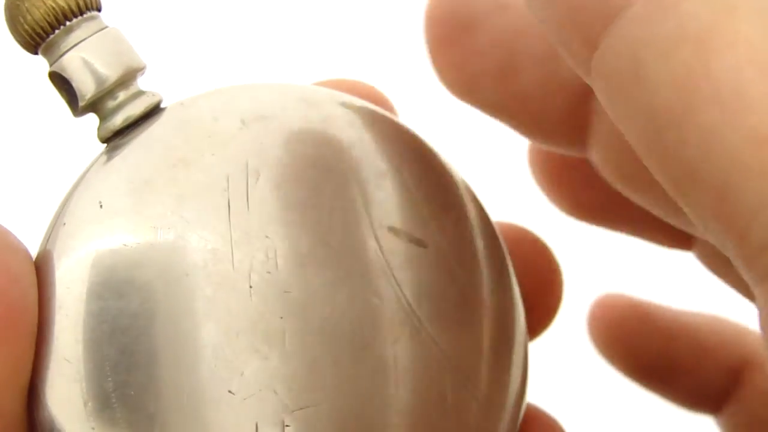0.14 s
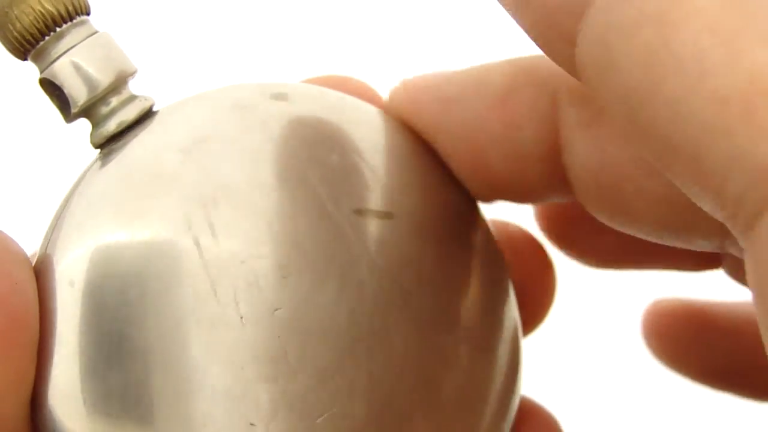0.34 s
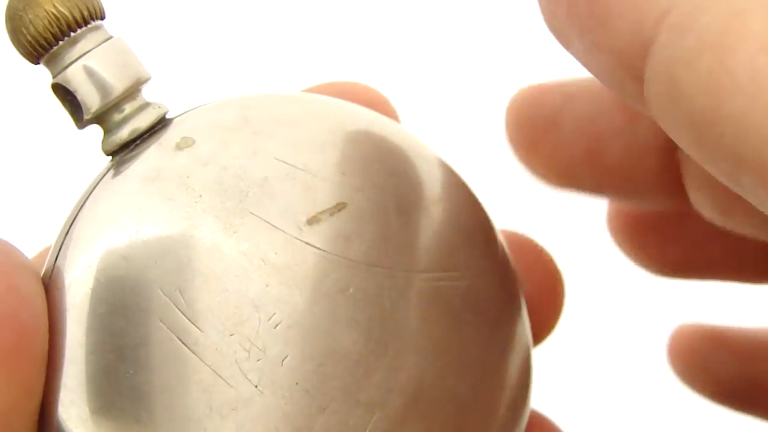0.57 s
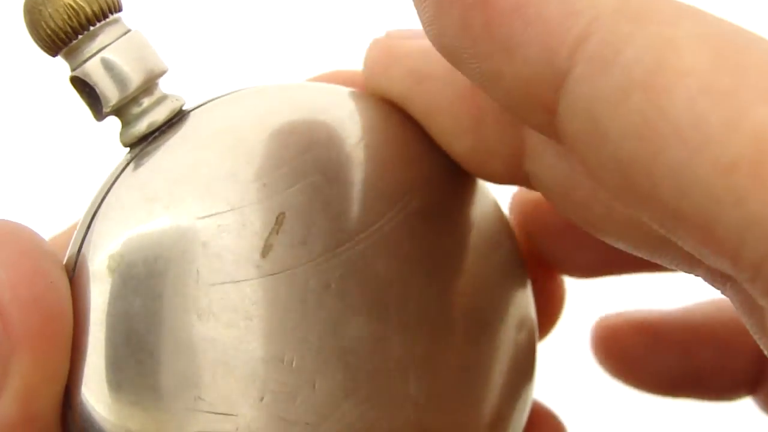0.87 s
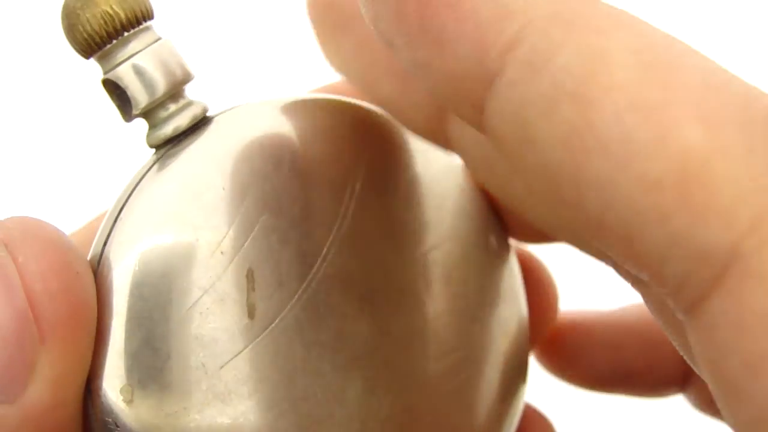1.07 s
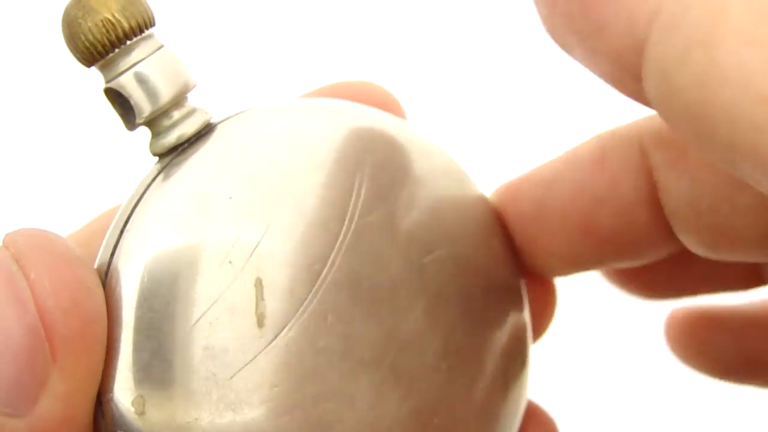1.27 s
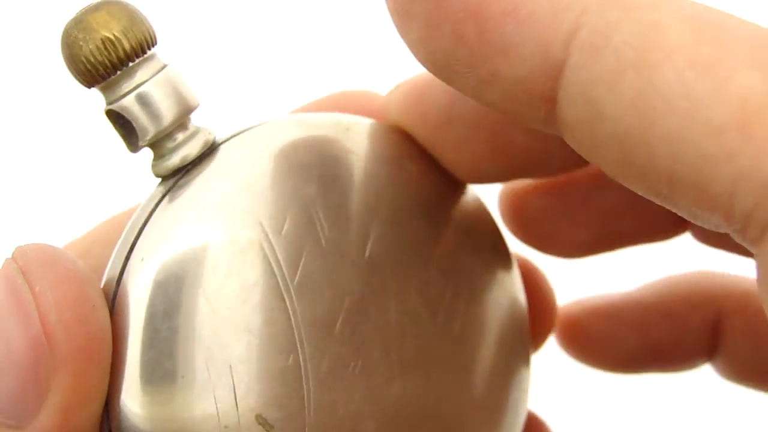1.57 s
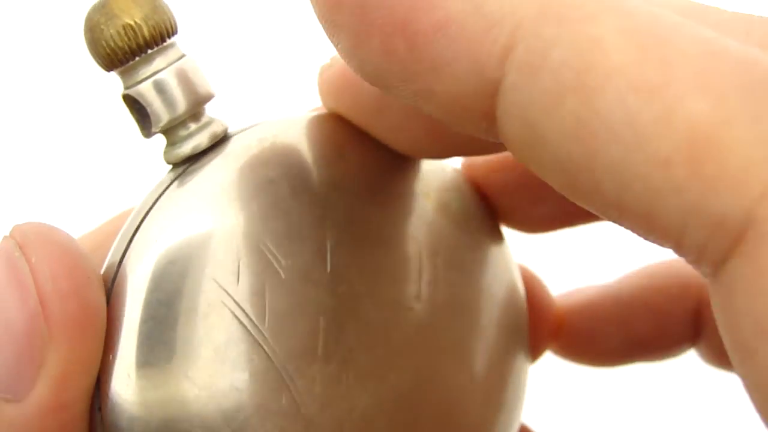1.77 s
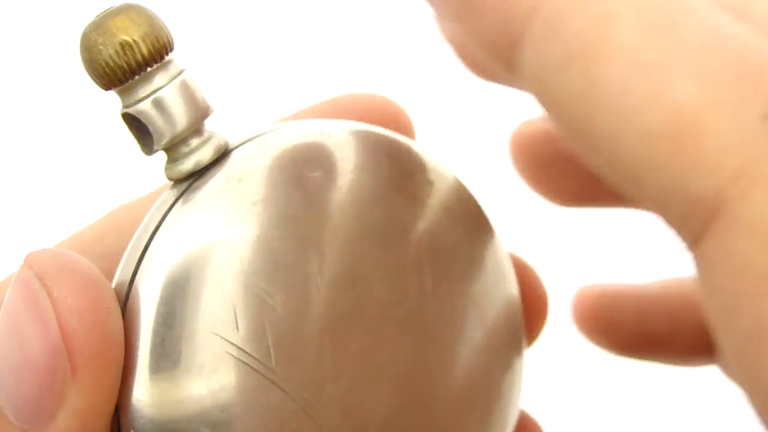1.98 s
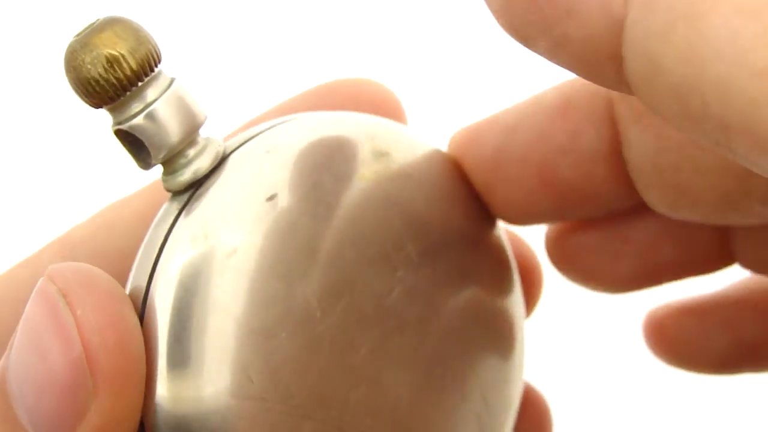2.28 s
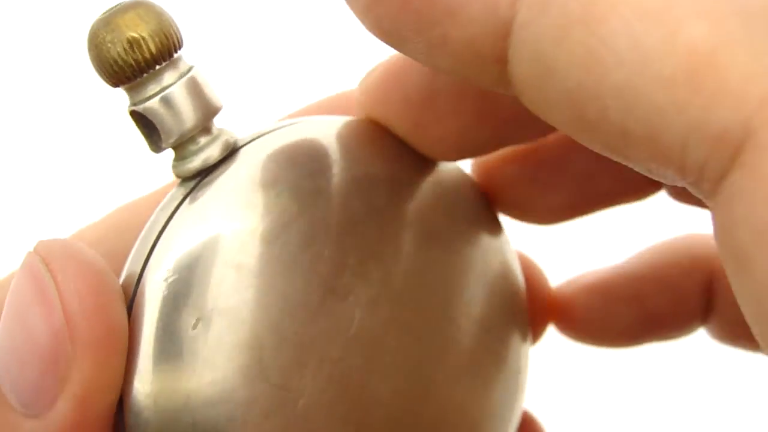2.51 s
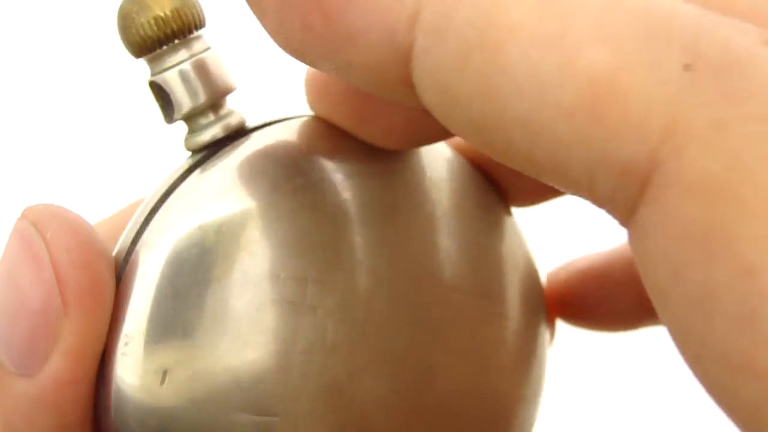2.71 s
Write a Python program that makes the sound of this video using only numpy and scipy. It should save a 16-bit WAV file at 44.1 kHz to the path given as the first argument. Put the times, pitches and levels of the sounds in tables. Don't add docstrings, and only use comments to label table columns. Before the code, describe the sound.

Close up in a quiet room, nails rub and slip around a thin metal watch case, gritty at first, then softer and sparser, before a much louder cluster of metallic clicks with a brief ring.

```python
import sys
import numpy as np
from scipy import signal
from scipy.fft import rfft, irfft
from scipy.io import wavfile

SR = 44100
rng = np.random.default_rng(int(sys.argv[2]) if len(sys.argv) > 2 else 0)


def how_loud(loudness_db):
    steps = np.asarray(loudness_db, float) / 20
    return 10 ** steps


def master_out(mix):
    frames = np.transpose(np.atleast_2d(mix))
    ceiling = np.clip(frames, -1, 1)
    pcm = np.round(ceiling * 32767).astype(np.int16)
    wavfile.write(sys.argv[1], SR, pcm)


N = 125685

# f/Hz, level/dB, t60/s
BACK_MODES = [(578.2, 5, 0.037), (658, -7, 0.061), (249, -25, 0.018)]
# f/Hz, level/dB, t60/s
SHELL_MODES = [(1300, 1.5, 0.03), (1760, -3.5, 0.04), (1873, -3.5, 0.023), (2160, 0, 0.016),
               (2330, 3.5, 0.017), (2830, 1.5, 0.014), (3118, -2, 0.018), (3890, -18, 0.02)]
# f/Hz, level/dB, t60/s
RIM_MODES = [(4697, -4, 0.039), (4770, 2, 0.015), (5200, -6, 0.0092), (5730, -8, 0.011),
             (6120, -12.5, 0.018), (6800, -4, 0.022), (7116, -8.5, 0.014), (7680, -25, 0.0076),
             (8900, -18.5, 0.0087), (9194, -9.5, 0.037), (9700, -14.5, 0.015), (10300, -11, 0.015),
             (11080, -22.5, 0.0052)]


def rubbing():
    # t/s, pressure/dB, weight on back and shell/dB
    early = [
        [(.02, -62, 2), (.036, -49.5, 0), (.064, -49, -16), (.09, -47.5, -4.5), (.124, -52, -2), (.14, -68, -8)],
        [(.33, -66, 5), (.352, -51.5, -7), (.378, -53.5, 5.5), (.415, -49.5, -7), (.46, -57, -7.5),
         (.5, -62.5, 12.5)],
        [(.72, -72, -14), (.74, -56, -3), (.8, -55, 0), (.86, -54.5, -2.5), (.92, -62, 0), (.98, -60.5, 2.5),
         (1.0, -54.5, -1), (1.08, -55.5, -1.5), (1.095, -74, -8)],
    ]
    # t/s, pressure/dB, weight on back and shell/dB
    late = [
        [(1.34, -62, 0), (1.39, -52, -7), (1.45, -52, -9.5), (1.52, -61.5, 1)],
        [(1.53, -65.5, 6.5), (1.62, -59, 3.5), (1.72, -58.5, -1.5), (1.8, -70.5, 4), (1.88, -58.5, 0),
         (1.93, -72, -7)],
        [(2.22, -57.5, -8), (2.29, -59, -7), (2.32, -54.5, -3.5), (2.41, -54.5, -2), (2.47, -57, -2),
         (2.55, -54, -11), (2.6, -56.5, -2)],
    ]
    # dry hiss level/dB, rim brightness/dB per octave, rim pitch under nail f/Hz
    character = [
        (3, 12.5, 6270),
        (0.5, 8, 6640),
        (1.5, 2, 6100),
        (-0.5, 8, 5150),
        (-1.5, 5.5, 4720),
        (-0.5, 5, 7070),
    ]
    edge_s, hiss_db = 0.0019, -1.5
    t = np.arange(N) / SR
    press, weight, grit, tilt, under_hz = np.zeros((5, N))
    for stroke, (grit_db, tilt_db, nail_hz) in zip(list(early) + list(late), character):
        s, db, weight_db = np.transpose(stroke)
        edge = np.clip(np.minimum(t - s[0], s[-1] - t) / edge_s, 0, 1)
        press += edge * how_loud(np.interp(t, s, db))
        weight += edge * how_loud(np.interp(t, s, db + weight_db))
        grit += edge * how_loud(np.interp(t, s, db) + grit_db)
        tilt += (edge > 0) * tilt_db
        under_hz += (edge > 0) * nail_hz
    hiss = how_loud(hiss_db) * np.convolve(grains() * grit, [.8, -.45])[:N]
    bend = -2 * np.cos(2 * np.pi * 8000 / SR)
    out = signal.lfilter([1, bend * 0.86, 0.91 ** 2], [1, bend * 0.89, 0.89 ** 2], hiss)
    out += rubbed(BACK_MODES, -5.5, weight, 0, under_hz)
    out += rubbed(SHELL_MODES, -1.5, weight, 0, under_hz)
    return out + rubbed(RIM_MODES, -2.5, press, tilt, under_hz)


def rubbed(modes, db, level, tilt, under_hz):
    wander_db, wander_s = 4, 0.04
    under_db, under_oct = 4.5, 0.056
    drive = grains() * level
    total = np.linalg.norm(how_loud(np.transpose(modes)[1]))
    out = np.zeros(N)
    for hz, mode_db, t60 in modes:
        gain = how_loud(db + mode_db + wander_db * drift(wander_s) + tilt * np.log2(hz / 6000)) / total
        octaves = np.log2(hz / (under_hz + 1))
        gain = gain * how_loud(under_db * np.exp(-(octaves / under_oct) ** 2))
        r, turn = how_loud(-60 / (t60 * SR)), 2 * np.pi * hz / SR
        poles = [1, -2 * r * np.cos(turn), r * r]
        out += signal.lfilter([np.sin(turn) * np.sqrt(2 - 2 * r * r)], poles, drive * gain)
    return out


def grains():
    per_s, spread_db, stick_db, stick_s = 6000, 2, 2, 0.0053
    sizes = how_loud(spread_db * np.minimum(rng.exponential(1, N), 4) + stick_db * drift(stick_s))
    hits = rng.random(N) < per_s / SR
    return evened(sizes * hits * rng.standard_normal(N))


def drift(seconds):
    noise = rng.standard_normal(N // 32 + 2)
    lowpass = signal.butter(2, 0.39 / seconds, fs=SR / 32, output="sos")
    smooth = signal.sosfilt(lowpass, noise)
    return np.interp(np.arange(N) / 32, np.arange(len(noise)), evened(smooth))


def evened(x):
    return x / np.sqrt(np.mean(x ** 2) + 1e-20)


def nail_slips(case):
    # t/s, strength level/dB, back thud level/dB, rim ring level/dB, favoured shell pitch f/Hz
    slips = [(0.0105, -33.5, 3, -11, 1300), (0.3279, -44, 0, -15, 1400), (.363, -35.5, -18, -10, 1300),
             (0.4187, -29, -15, -25, 1300), (0.4423, -31.5, -4, -27, 1980), (0.7374, -34, -23, -19, 1760),
             (.762, -34.5, -10.5, -12, 1760), (1.3802, -35, -4.5, -12, 2040),
             (1.4924, -32, -0.5, -15, 2420), (1.505, -37, -1, -5, 1300), (1.713, -37, -20, -11, 2300),
             (1.7767, -37, 9, -17, 1760), (1.9042, -41.5, -1, -12, 2000), (1.9655, -24.5, -9, -7.5, 1520),
             (2.2554, -31.5, -10.5, -11, 2510), (2.2754, -38, 7, -11, 3080),
             (2.401, -31.5, -11.5, -17, 2220), (2.6053, -14, -9, -23, 2170), (2.6092, -12.5, -5, -25, 2050),
             (2.6206, -18, -16, -13, 2170), (2.615, -23, -13, -12, 2830), (2.6249, -16.5, -14, -13, 2280),
             (2.7548, -38.5, -26, -2, 1630)]
    for s, *touch in slips:
        add(case, s, scuff(*touch, drag=False))


def nail_drags(case):
    # t/s, strength level/dB, back thud level/dB, rim ring level/dB, favoured shell pitch f/Hz
    drags = [(.067, -49, 10, -8, 1300), (.077, -39.5, 3.5, -4, 1300), (.09, -34.5, 4, -11, 3120),
             (.1, -34, 2, -14, 1760), (.112, -34.5, -25, -13, 2160), (.364, -33, -5.5, -18, 1300),
             (.374, -33.5, -5, -5.5, 1300), (.387, -32, -5.5, -6, 1300), (.714, -46.5, 10, -8, 1800),
             (.748, -39, -6, -12, 1900), (.773, -43.5, 3.5, -12, 1760), (1.038, -36.5, -10, -21, 2200),
             (1.052, -44.5, -2, -17, 1760), (1.07, -38.5, -13, -9.5, 2500), (1.325, -40, -7, -16, 2600),
             (1.341, -46, 8, -18, 2600), (1.398, -38, -10, -16, 2830), (1.412, -55, 5, -12, 2000),
             (1.421, -35, -23, -18, 2670), (1.43, -40, -19, -16, 2830), (1.465, -39, -14, -3, 2400),
             (1.615, -41, -4.5, -17, 2300), (1.637, -35, -4, -17, 1550), (1.746, -46, 11, -16, 1990),
             (1.764, -43.5, 11.5, -18, 2300), (1.813, -39, 0, -16, 2000), (1.863, -45.5, -0.5, -14, 2400),
             (1.826, -38, 1.5, -13.5, 1760), (1.96, -45, 8.5, 4, 2000), (2.586, -31.5, -15, -6.5, 2350),
             (2.6, -29.5, -7, -10, 2300), (2.612, -27, -28, -14, 2170), (2.629, -23.5, -5.5, -20, 1760),
             (2.639, -34.5, -8, -10, 1760)]
    for s, *touch in drags:
        add(case, s, scuff(*touch, drag=True))


def scuff(db, thud_db, rim_db, near_hz, drag):
    grit = contact(drag)
    push_s = 0.0057 if drag else 0.0032
    push = np.minimum(np.arange(2400) / SR / push_s, 1)
    sound = how_loud(thud_db + 5.5) * push * ring(BACK_MODES).sum(0)
    sound += strike(ring(SHELL_MODES, near_hz, -13.5), grit)
    sound += how_loud(rim_db + 1) * strike(ring(RIM_MODES), grit)
    tick = signal.lfilter([.3, 0, -.3], [1, -1.15, .55], grit)
    sound[:1024] += how_loud(rim_db + 2) * tick
    return how_loud(db + 0.5) * sound


def rim_tings(case):
    # t/s, strength level/dB, favoured pitch f/Hz
    tings = [(.057, -40, 10200), (.074, -54, 6240), (.092, -32.5, 4770), (.114, -50, 6800),
             (.366, -45, 4700), (.385, -38, 4670), (.411, -42, 6800), (1.381, -35.5, 5050),
             (1.428, -43, 4700), (1.505, -33.5, 4600), (1.9665, -30.5, 4840), (1.967, -36, 10300),
             (2.255, -52, 4660), (2.588, -46, 4750), (2.606, -18, 4640), (2.6215, -22, 4770)]
    for s, db, hz in tings:
        add(case, s, how_loud(db) * strike(ring(RIM_MODES, hz, -50), contact(False)))


def lid_pops(case):
    # t/s, strength level/dB, favoured pitch f/Hz
    pops = [
        (1.968, -48, 9295),
        (2.6065, -30, 9400),
        (2.6215, -24, 6000),
        (2.632, -30, 5100),
        (2.7545, -44, 6440),
    ]
    # f/Hz, level/dB, t60/s
    lid_modes = [(4950, 0, .08), (6720, -10, .06), (6885, -7, .09), (9297, -14, .11), (4660, -8, .045),
                 (7924, -25, .06), (10140, -26, .06)]
    for s, db, hz in pops:
        add(case, s, how_loud(db) * ring(lid_modes, hz, -12, size=6000).sum(0))


def ring(modes, near_hz=None, favour_db=0., size=2400):
    spot_db, rise_cycles = 2, 0.57
    hz, db, t60 = np.transpose(modes)[:, :, None]
    t = np.arange(size) / SR
    weight, detune = rng.standard_normal((2, len(modes), 1))
    if near_hz:
        db = db + favour_db * abs(np.log2(hz / near_hz))
    tones = np.sin(2 * np.pi * hz * (1 + 0.0015 * spot_db * detune) * t)
    rise = 1 - np.exp(-t * hz / rise_cycles)
    decay = how_loud(db + spot_db * weight - 60 * t / np.maximum(t60, .003))
    return decay * tones * rise / np.linalg.norm(how_loud(db))


def contact(drag):
    knock_s, drag_s = 0.0013, 0.0093
    t = np.arange(1024) / SR
    if drag:
        shape = np.sin(np.pi * np.clip(t / drag_s, 0, 1))
    else:
        shape = t * np.exp(-2 * t / knock_s)
    grit = rng.standard_normal(1024) * shape
    return grit / np.linalg.norm(grit)


def strike(body, grit):
    struck = signal.fftconvolve(body, grit[None], axes=1)[:, :body.shape[1]]
    return np.linalg.norm(body, axis=1) / np.linalg.norm(struck, axis=1) @ struck


def add(mix, s, sound):
    part = mix[max(round(s * SR), 0):][:len(sound)]
    part += sound[:len(part)]


def room(x):
    t60_s = 0.15
    t = np.arange(8000) / SR
    tail = rng.standard_normal(8000) * how_loud(-60 * t / t60_s) * (t > .003)
    return how_loud(-21.5) * signal.oaconvolve(x, tail / np.linalg.norm(tail))[:N]


def air():
    # f/Hz, level/dB per Hz
    spectrum = [(18, -50), (30, -21), (221, -2), (685, -3), (1550, -8.5), (1750, -8), (3840, -14),
                (4680, -13.5), (10800, -19.5), (14100, -45), (22000, -120)]
    f, db = np.transpose(spectrum)
    hz = np.fft.rfftfreq(N, 1 / SR)
    colour = how_loud(np.interp(np.log(hz + 1), np.log(f + 1), db))
    return how_loud(-55) * evened(irfft(rfft(rng.standard_normal(N)) * colour, N))


def scene():
    case = rubbing()
    nail_slips(case)
    nail_drags(case)
    rim_tings(case)
    lid_pops(case)
    case = signal.sosfilt(signal.butter(4, 228, "high", fs=SR, output="sos"), case)
    return (case + room(case) + air())[None]


def top_cut(x):
    return signal.sosfilt(signal.butter(12, 10970, fs=SR, output="sos"), x)


def record(dry):
    lowpass = signal.firwin(401, 10950, window=("kaiser", 9), fs=SR)
    mix = signal.oaconvolve(dry, lowpass[None], "same")
    return top_cut(mix)


dry = scene()
out = record(dry)
master_out(out)
```